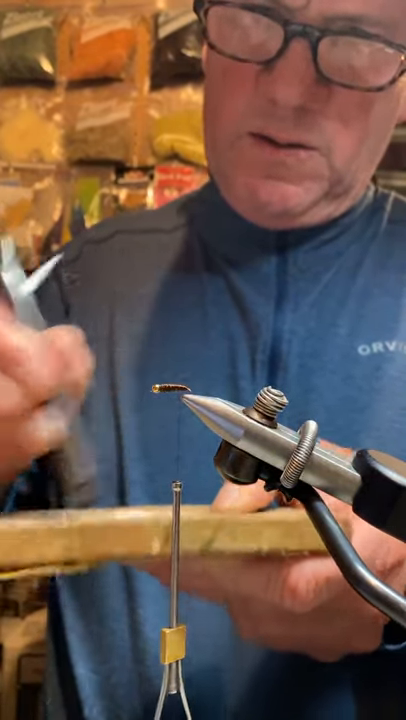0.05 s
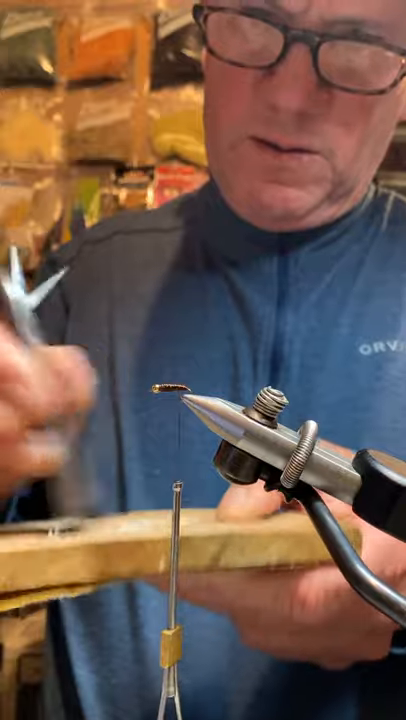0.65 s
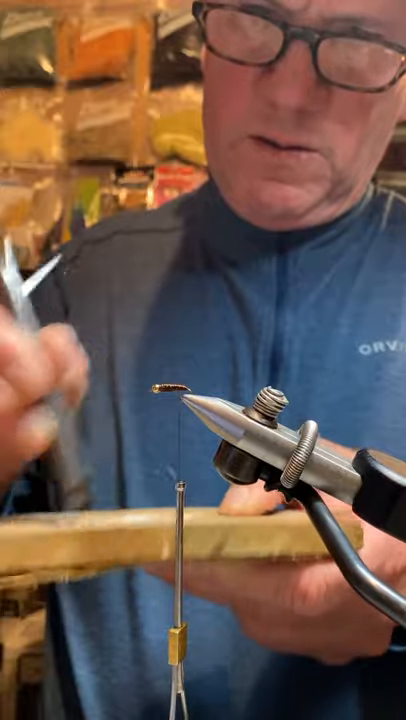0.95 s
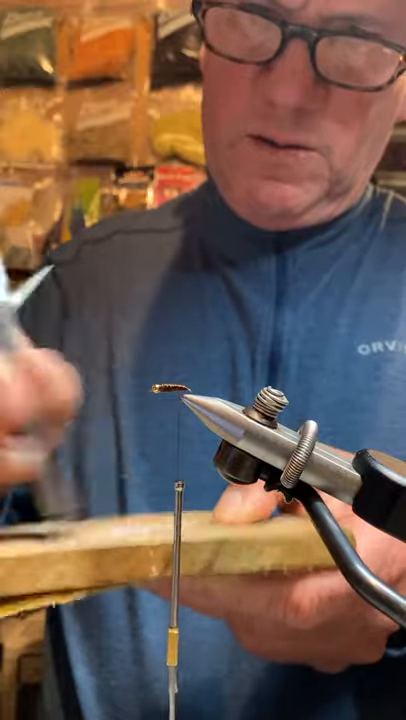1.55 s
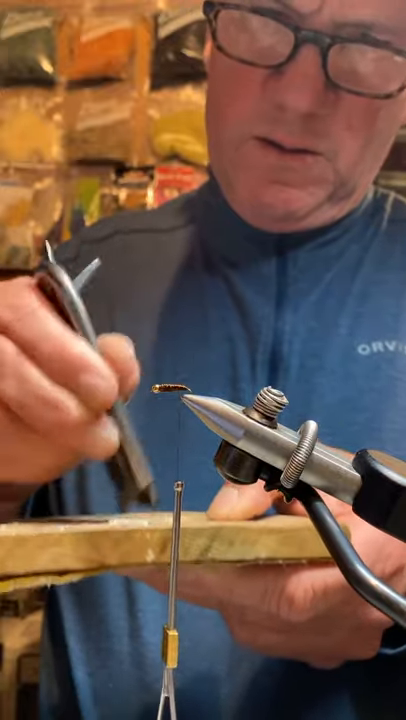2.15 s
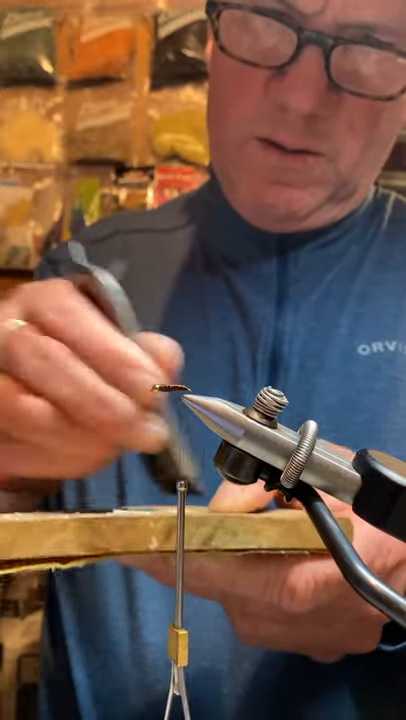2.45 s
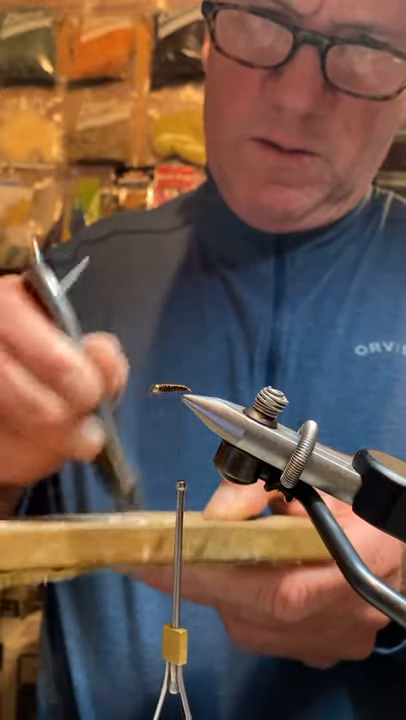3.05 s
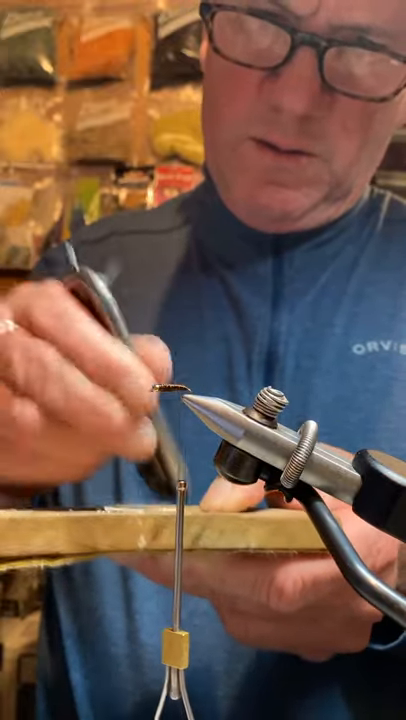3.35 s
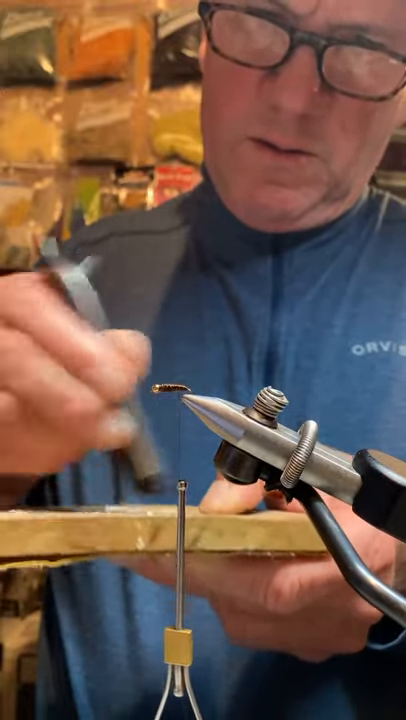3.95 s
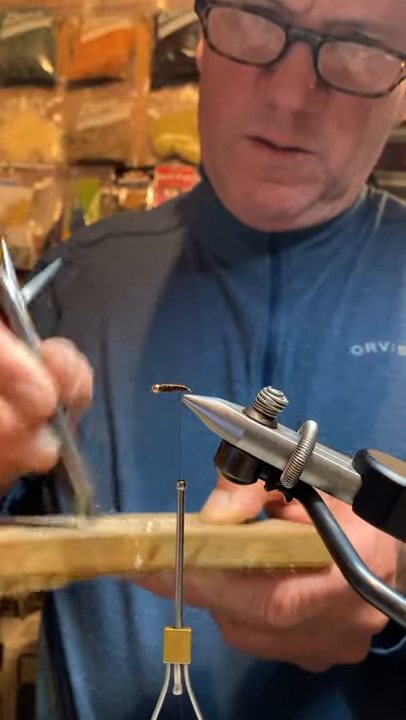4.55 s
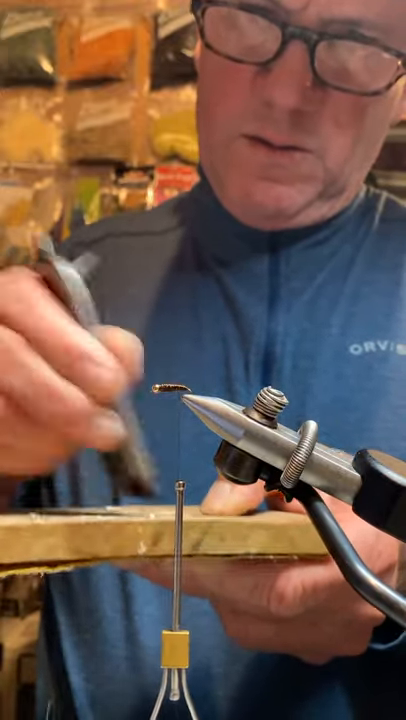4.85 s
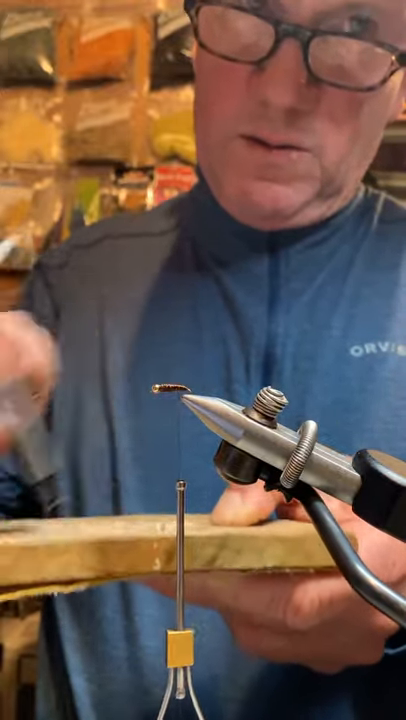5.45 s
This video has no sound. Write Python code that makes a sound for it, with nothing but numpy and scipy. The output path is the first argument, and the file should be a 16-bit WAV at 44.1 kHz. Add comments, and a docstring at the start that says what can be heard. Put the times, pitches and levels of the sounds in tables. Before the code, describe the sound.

In a small workroom, a steel scissor blade works along a wet quill lying on a wooden board, making a fast, steady run of short, scratchy scrapes. Dull wooden knocks mark the opening strokes, then give way to brighter metallic clicks. The scraping eases for a moment and firms up again toward the end, over faint room noise and a low electrical hum.

```python
"""Scraping a feather quill

A scissor blade scrapes a soaked quill on a hand-held wooden board, about 4.5 strokes a second.
In each stroke the blade lands, rebounds, glides, bites into the quill with a rasp and flicks off.
At the board's free end the landings thud; nearer the holding hand they click and ring.
A small workroom answers, over a faint mains hum."""
import sys
import numpy as np
from scipy import signal
from scipy.fft import rfft, irfft, next_fast_len
from scipy.io import wavfile
from scipy.ndimage import map_coordinates

SR = 44100
rng = np.random.default_rng(int(sys.argv[2]) if len(sys.argv) > 2 else 0)


def pcm_store(signal):
    """Save signal as 16-bit PCM."""
    levels = np.round(np.clip(np.atleast_2d(signal), -1, 1) * 32767)
    wavfile.write(sys.argv[1], SR, levels.astype(np.int16).T)


N = 242417

# blade strokes, levels relative: (landing time [s], rebound delay [s], bite delay [s], flick delay [s],
# landing [dB], rebound [dB], catch [dB], rasp at the bite [dB], rasp at the end [dB], flick [dB])
STROKES = [(0.0443, 0.009, 0.054, 0.081, -49.5, -38, -49, -36, -36, -46),
           (.266, 0.013, .074, 0.081, -48, -43.5, -62, -46.5, -39, -41),
           (0.4981, 0.0097, 0.062, 0.076, -48, -46, -51, -40, -43.5, -39),
           (0.7265, 0.0065, 0.056, 0.074, -48, -41.5, -37.5, -37, -32, -45),
           (.959, 0.0094, .0586, 0.089, -49.5, -43.5, -35, -38, -35.5, -43),
           (1.189, 0.0082, 0.055, 0.069, -45, -38, -38, -37, -38, -42),
           (1.4117, .0064, 0.046, 0.073, -43.5, -44, -35, -32, -44, -38.5),
           (1.63, .004, 0.04, 0.067, -33.5, -43, -42, -37, -35, -35.5),
           (1.942, 0.0086, 0.026, 0.062, -63, -48, -58, -62, -47.5, -40.5),
           (2.181, .0097, 0.059, 0.068, -72, -40, -55, -49, -46.5, -37.5),
           (2.4097, 0.0042, 0.048, 0.073, -48, -42, -65, -47, -57.5, -42),
           (2.624, 0.0092, 0.047, 0.077, -64, -39, -63, -49.5, -50, -41),
           (2.8358, 0.017, 0.058, .089, -43.5, -36, -59, -44, -48, -42.5),
           (3.070, .0154, .054, .073, -49.5, -45.5, -46, -47, -50.5, -41),
           (3.284, 0.0092, .0515, .073, -49, -41, -46, -45.5, -41, -41.5),
           (3.502, 0.0058, 0.046, 0.073, -38, -42, -39.5, -41, -45.5, -40),
           (3.717, .006, .0475, 0.071, -40, -39, -39, -44, -46, -41),
           (3.923, .01, .053, 0.087, -42, -42, -36.5, -41, -46.5, -45),
           (4.1431, 0.0083, .047, 0.082, -40.5, -43.5, -50, -39.5, -46.5, -48),
           (4.3636, 0.0039, 0.047, 0.077, -39.5, -37.5, -47, -39.5, -43.5, -42),
           (4.5727, .007, 0.049, 0.098, -37, -41, -56, -39.5, -50, -48.5),
           (4.7972, 0.0094, 0.043, 0.077, -39, -40, -48, -41, -44.5, -35.5),
           (5.0207, 0.0078, 0.036, 0.071, -38, -39.5, -44, -41, -41, -40),
           (5.2489, 0.0068, 0.035, 0.073, -31.5, -38, -50, -34, -38, -36),
           (5.4631, .005, .045, .077, -31.5, -38, -45, -42, -48, -44)]
# where the blade works: (time [s], place [0 at the board's free end, 1 near the holding hand])
PLACE = [(0, 0.08), (.27, 0.014), (1.19, 0.1), (1.41, 0.62), (1.63, 0.61), (1.95, 0.83), (4.8, 0.79),
         (5.25, 0.6), (5.46, 0.7)]
# tone of the board's knock, the steel's click and the edge's snap: (frequency [Hz], level [dB])
KNOCK = [(60, -17), (200, -17.5), (450, -10), (780, -15.5), (1100, 0.5), (1800, 2.5), (2400, -4),
         (3500, -4), (8000, -62)]
CLICK = [(500, -41), (1500, -11.5), (2500, -9), (3600, -2.5), (5400, -3), (7000, -3.5), (8500, -17.5),
         (14000, -25.5)]
SNAP = [(2000, -54.5), (6000, -15.5), (8000, 1), (10000, 2.5), (13500, 1), (16000, -8)]
LANDING, REBOUND, CATCH, FLICK = range(4)


def amp(db):
    """Decibels to amplitude."""
    return 10 ** (np.asarray(db) / 20)


def unit(x):
    """x scaled to rms 1."""
    return x / np.sqrt(np.mean(x ** 2) + 1e-20)


def between(points, x):
    """(x, value) points joined by straight lines."""
    return np.interp(x, *np.transpose(points))


def along(points, hz):
    """(frequency [Hz], value) points read on a log axis."""
    f, v = np.transpose(points)
    return np.interp(np.log(hz + 1), np.log(f + 1), v)


def wobble(rate):
    """A smooth random curve, rate knots a second."""
    return map_coordinates(rng.standard_normal(int(N * rate / SR) + 4), [np.arange(N) * rate / SR])


def filtered(x, response):
    """x shaped by a frequency response."""
    size = next_fast_len(N + SR // 2)
    return irfft(rfft(x, size) * response(np.fft.rfftfreq(size, 1 / SR)), size)[:N]


def add(out, s, sound):
    """Mix a sound into out, starting at s seconds."""
    span = out[max(round(s * SR), 0):][:len(sound)]
    span += sound[:len(span)]


def background(mains_hz=120):
    """Steady room tone and a slightly unsteady mains hum."""
    # room tone: (frequency [Hz], level [dB])
    air_spectrum = [(15, -36), (25, -18), (97, 2), (256, -5), (840, -11), (988, -17), (1370, -16),
                    (1740, -18.5), (3620, -22), (6920, -20.5), (7510, -23), (10100, -28.5), (13600, -31),
                    (16000, -50)]
    air = unit(filtered(rng.standard_normal(N), lambda hz: amp(along(air_spectrum, hz))))
    phase = 2 * np.pi * mains_hz * np.arange(N) / SR + 0.13 * wobble(3.4)
    hum = amp(-76 + 1.4 * wobble(4.4)) * unit(np.sin(phase)) + amp(-79) * unit(np.sin(phase / 2))
    return amp(-69) * air + hum


def touches(kinds):
    """Blade contacts: (time [s], click [dB], knock [dB], snap [dB], ring [dB], ring pitch [Hz])."""
    # the blade stumbles and lands again in mid-stroke: (time [s], level [dB])
    stumbles = [(2.8648, -28.5)]
    # the edge snags on the quill, in mid-rasp or grazing by between strokes: (time [s], level [dB])
    snags = [(2.8559, -34), (2.861, -33), (2.876, -40), (4.536, -60), (4.552, -64), (5.085, -39),
             (5.138, -61), (5.307, -28.5)]
    # balance against the click, rows landing, rebound, catch, flick: (knock [dB], snap [dB], ring [dB])
    at_free_end = [(7, -5.5, -16), (3.5, -9.5, -17.5), (-31, 0, -12), (-9, -10, -6)]
    near_hand = [(-9, -8.5, -0.5), (-5, -11.5, -1.3), (-14, -11.5, -12), (-8.5, -6, -2)]
    # the mode that each of those four sets ringing: (frequency [Hz])
    ring_hz = [3586, 1313, 3760, 4262]
    events = [(LANDING, s, db) for s, db in stumbles] + [(CATCH, s, db) for s, db in snags]
    for land, rebound, bite, flick, land_db, rebound_db, catch_db, _, _, flick_db in STROKES:
        events += [(LANDING, land, land_db), (REBOUND, land + rebound, rebound_db),
                   (CATCH, land + bite, catch_db), (FLICK, land + flick, flick_db)]
    rows = []
    for kind, s, db in events:
        if kind in kinds:
            place = np.clip(between(PLACE, s), 0, 1)
            colour = (1 - place) * np.array(at_free_end[kind]) + place * np.array(near_hand[kind])
            rows.append((s, db, *(db + colour), ring_hz[kind]))
    return rows


def body(spectrum, woody_db=0, keen_db=0, vary_db=2, size=4096):
    """The ring of scissors and board; every point of contact weights the resonances anew."""
    # resonances: (frequency [Hz], width [Hz], lift [dB])
    modes = [(508.5, 11, 3), (622, 25, 8.5), (882, 18, 5), (1033, 74, 4.5), (1147, 61, 0), (1363, 68, 3),
             (1532, 73, 4.5), (1685, 52, 3), (2052, 110, 2), (2205, 100, 4), (2880, 330, 5.5),
             (3717, 75, 3), (3790, 420, 4.5), (4210, 200, 4), (4825, 170, 5), (6523, 280, 7.5),
             (7110, 220, 5), (8610, 120, 1), (9925, 180, 5)]
    hz = np.fft.rfftfreq(size, 1 / SR)
    peaks_db = sum((lift + rng.normal(0, vary_db)) / (1 + (2 * (hz - centre) / width) ** 2)
                   for centre, width, lift in modes)
    shelves_db = along([(1900, woody_db), (3000, 0.03), (4000, 0.016), (5200, keen_db)], hz)
    cepstrum = irfft(np.log(amp(along(spectrum, hz) + peaks_db + shelves_db)))
    # minimum phase: nothing rings before the hit
    cepstrum[1:size // 2] *= 2
    cepstrum[size // 2 + 1:] = 0
    ring = irfft(np.exp(rfft(cepstrum)))
    return ring / np.linalg.norm(ring)


def taps(times, levels_db, spectrum, chatter_t60, chatter, brush_db, brush_s):
    """At each contact the edge brushes the quill, pushes once and chatters to rest, ringing the body."""
    lead = round(0.03 * SR)
    t = np.arange(-lead, SR // 8) / SR
    envelope = np.where(t < 0, amp(brush_db + 20 * t / brush_s), amp(-60 * abs(t) / chatter_t60))
    out = np.zeros(N)
    for s, db in zip(times, levels_db):
        push = rng.standard_normal(len(t)) * envelope
        push *= chatter / np.linalg.norm(push)
        push[lead] = 1
        tap = signal.fftconvolve(push, body(spectrum))
        attack = tap[lead:lead + round(0.006 * SR)]
        add(out, s - lead / SR, amp(db) * tap / np.std(attack))
    return out


def shifting(x, depth_db, width_hz=450, hold_s=0.012):
    """The travelling edge favours ever different frequencies, each for a moment."""
    hz, t, bands = signal.stft(x, SR, nperseg=256)
    grid = np.meshgrid(hz / width_hz, t / hold_s, indexing="ij")
    flicker = map_coordinates(rng.standard_normal((128, 1024)), grid, mode="mirror")
    gain = unit(amp(depth_db * np.clip(flicker, -2, 2)))
    return signal.istft(bands * gain, SR, nperseg=256)[1][:N]


def landings():
    """The blade comes down from the air, so thud, knock, click and snap all have a hard attack."""
    # tone of the whole board shaking: (frequency [Hz], level [dB])
    thud_spectrum = [(35, -21), (80, 3), (200, -13), (400, -13.5), (600, -3.5), (950, 3.5), (1500, 4.5),
                     (2100, -9), (2800, -17), (6000, -68)]
    # weight of the thud against the click: (place [0-1], level [dB])
    thud_by_place = [(0, 9.5), (.6, -25), (1, -26)]
    s, click_db, knock_db, snap_db, _, _ = np.transpose(touches([LANDING]))
    thud_db = click_db + between(thud_by_place, between(PLACE, s))
    thud = taps(s, thud_db, thud_spectrum, chatter_t60=0.15, chatter=1.44, brush_db=-36, brush_s=0.003)
    knock = taps(s, knock_db, KNOCK, chatter_t60=0.062, chatter=1.6, brush_db=-25, brush_s=0.005)
    click = taps(s, click_db, CLICK, chatter_t60=0.049, chatter=2.8, brush_db=-13, brush_s=0.011)
    snap = taps(s, snap_db, SNAP, chatter_t60=0.031, chatter=2.6, brush_db=-25, brush_s=0.008)
    wood = amp(-2.5) * thud + amp(-1.8) * knock
    steel = amp(-2.5) * click + amp(0.8) * snap
    return wood + shifting(steel, depth_db=1)


def pings(t60_at_1khz=0.058, damping=0.45, attack_s=0.00078, rattle=0.32, detune=0.013):
    """Each contact rings one mode, damped by the hand and jostled by the blade; high ones die sooner."""
    t, out = np.arange(SR // 6) / SR, np.zeros(N)
    jostle = rattle * wobble(250)
    onset = 1 - np.exp(-t / attack_s)
    for s, _, _, _, db, hz in touches([LANDING, REBOUND, CATCH, FLICK]):
        t60 = t60_at_1khz * (hz / 1000) ** -damping
        pitch_hz = hz * (1 + detune * rng.standard_normal())
        phase = 2 * np.pi * pitch_hz * t + np.roll(jostle, -round(s * SR))[:len(t)]
        add(out, s, amp(db + 6.5 - 60 * t / t60) * onset * np.sin(phase))
    return out


def slips(rate, spread_db):
    """Tiny stick-slip jerks at random times and of uneven size, rate a second."""
    sizes = amp(spread_db * np.clip(rng.standard_normal(N), -2, 2)) * rng.choice([-1, 1], N)
    return unit(sizes * (rng.random(N) < rate / SR))


def scrape(hold_s=0.0037, release_s=0.015, release_db=14):
    """The edge glides lightly, then bites and tears along the quill's fibres until it lifts."""
    # tone of the rasp: (frequency [Hz], level [dB])
    rasp_spectrum = [(80, -25), (300, -13), (750, -10.5), (1050, -3), (1600, -5), (2400, -4.5),
                     (3600, -1.5), (5000, -1.5), (6800, -5), (8500, -10.5), (14000, -44)]
    # its woody lows, its keen edge above 5 kHz and its finest hiss: (place [0-1], level [dB])
    woody_by_place = [(0, -3), (.6, 0), (1, 2)]
    keen_by_place = [(0, 3), (.6, 7), (1, -4.1)]
    fizz_by_place = [(0, -5), (.6, -2.5), (1, -9.5)]
    # a firm catch starts the rasp at once, a weak one lets it swell: (catch over rasp [dB], rise [s])
    rise_by_catch = [(-14, 0.01), (0.5, 0.0038)]
    t, out = np.arange(SR // 4) / SR, np.zeros(N)
    jerks = unit(slips(rate=14000, spread_db=2.8) * amp(1.5 * wobble(380)))  # fibres give way in clumps
    for land, _, bite, flick, _, rebound_db, catch_db, bite_db, end_db, _ in STROKES:
        place, lift = between(PLACE, land), flick + hold_s
        rise = between(rise_by_catch, catch_db - bite_db)
        glide_db = (rebound_db + end_db) / 2 - 12.5  # well under the stroke's pressure
        times = [0, bite - rise, bite, lift - rise, lift + release_s, lift + 4 * release_s]
        levels = [glide_db, glide_db, bite_db, end_db, end_db - release_db, -100]
        pressure = amp(np.interp(t, np.maximum.accumulate(times), levels))
        force = pressure * np.roll(jerks, -round(land * SR))[:len(t)]
        woody_db, keen_db = between(woody_by_place, place) - 1, between(keen_by_place, place)
        rasp = amp(-1.5) * body(rasp_spectrum, woody_db, keen_db)
        fizz = amp(between(fizz_by_place, place) - 6) * body(SNAP)
        add(out, land, signal.fftconvolve(force, rasp + fizz))
    return out


def blade_ticks():
    """Rebounds, catches and flicks grow out of the rubbing: board knocks, steel clicks, edge snaps."""
    s, click_db, knock_db, snap_db, _, _ = np.transpose(touches([REBOUND, CATCH, FLICK]))
    knock = taps(s, knock_db, KNOCK, chatter_t60=0.082, chatter=2.3, brush_db=-13, brush_s=0.015)
    click = taps(s, click_db, CLICK, chatter_t60=0.034, chatter=3.1, brush_db=-11, brush_s=0.011)
    snap = taps(s, snap_db, SNAP, chatter_t60=0.029, chatter=5, brush_db=-9, brush_s=0.0062)
    return amp(-2.5) * knock + shifting(amp(-1.5) * click + snap, depth_db=3)


def grip(centre_hz=350, octaves=0.91):
    """A hand shifts its grip on the board: skin drags on the wood with a soft, dull rub."""
    # swells of rubbing: (peak time [s], length [s], level [dB])
    rubs = [(5.046, 0.034, -56), (5.094, 0.027, -55), (5.127, .04, -68)]
    t = np.arange(N) / SR
    swell = sum(amp(db) * np.exp(-(2 * (t - s) / length) ** 2) for s, length, db in rubs)
    jerks = slips(rate=900, spread_db=4.5)
    drag = filtered(jerks, lambda hz: np.exp(-(np.log2((hz + 1) / centre_hz) / octaves) ** 2))
    return swell * unit(drag)


def room(x, early_db, early_t60, late_db):
    """Bench and shelves answer at once, a little differently as the hands move; the tail lingers."""
    # decay of the tail: (frequency [Hz], time to fall 60 dB [s])
    tail_t60 = [(200, 0.91), (1500, 0.18), (5000, 0.2), (14000, 0.16)]
    out, size = np.zeros(N), SR // 3
    starts = [0] + [stroke[0] - 0.04 for stroke in STROKES[1:]]  # fresh reflections for each stroke
    for start, end in zip(starts, starts[1:] + [N / SR]):
        hz, t, bands = signal.stft(rng.standard_normal(size), SR, nperseg=256)
        decay = amp(-60 * t / along(tail_t60, hz)[:, None])
        late = signal.istft(bands * decay, SR, nperseg=256)[1][:size]
        early = rng.standard_normal(size) * amp(-60 * np.arange(size) / SR / early_t60)
        answer = amp(early_db) * early / np.linalg.norm(early)
        answer += amp(late_db) * late / np.linalg.norm(late)
        add(out, start + 0.002, signal.fftconvolve(x[round(start * SR):round(end * SR)], answer))
    return out


def scene():
    """Blade, board and hand in the workroom, in mono; the pings go lightly into the reverb."""
    handwork = landings() + blade_ticks() + shifting(scrape(), depth_db=4) + grip()
    ringing = pings()
    reverb = room(handwork + amp(-8.5) * ringing, early_db=-9.5, early_t60=0.096, late_db=-18.5)
    return (handwork + ringing + reverb + background())[None]


def record(dry):
    """The microphone keeps nothing above its band limit."""
    top_hz = 15950
    return filtered(dry[0], lambda hz: 1 / (1 + (hz / top_hz) ** 160))[None]


dry = scene()
out = record(dry)
pcm_store(out)
```